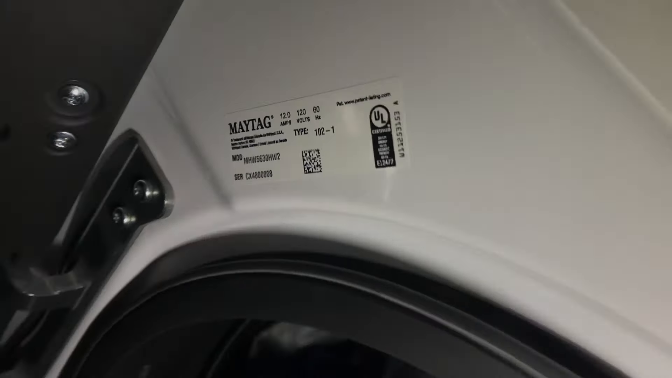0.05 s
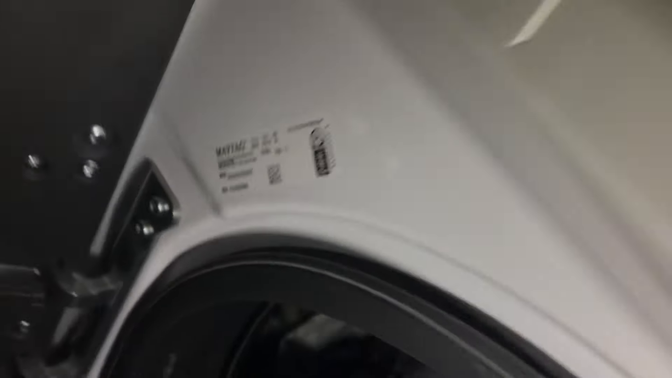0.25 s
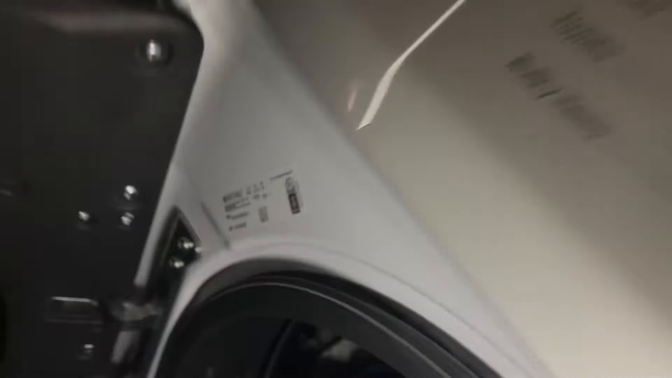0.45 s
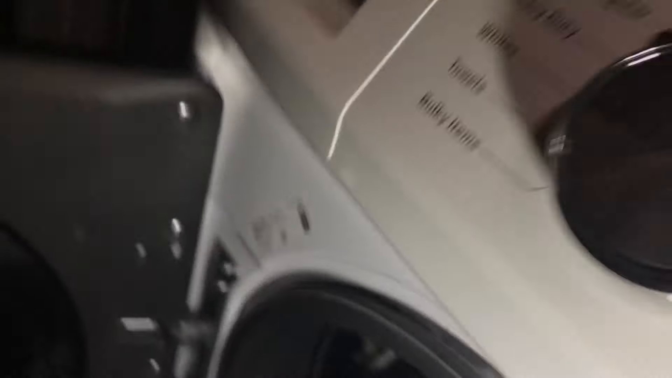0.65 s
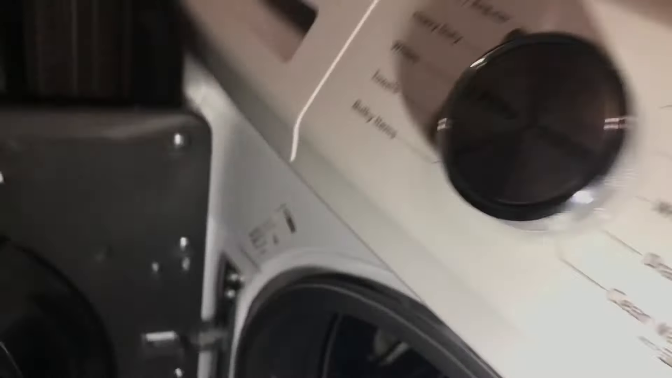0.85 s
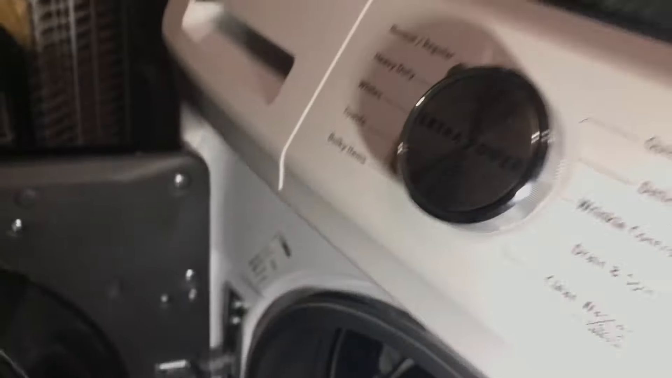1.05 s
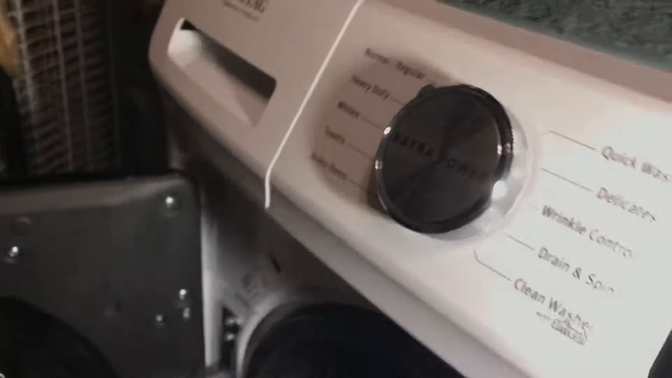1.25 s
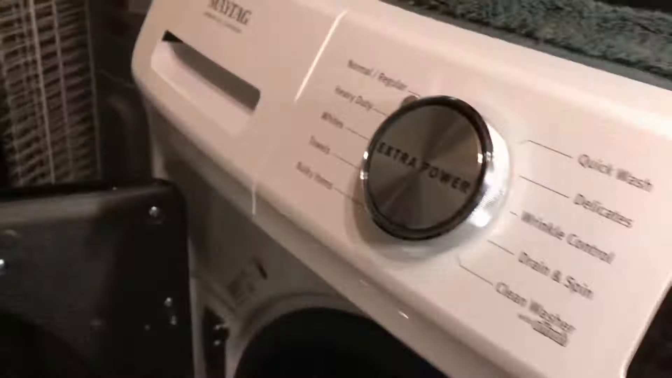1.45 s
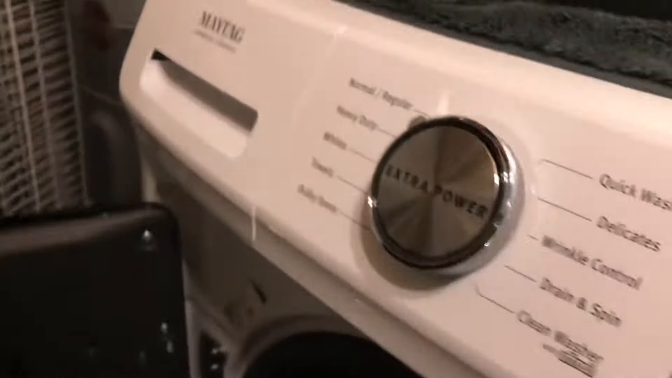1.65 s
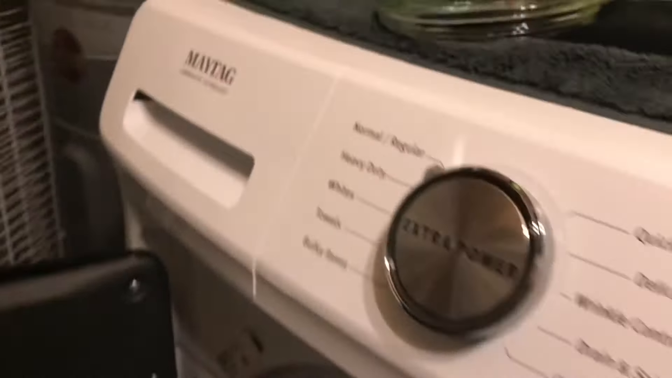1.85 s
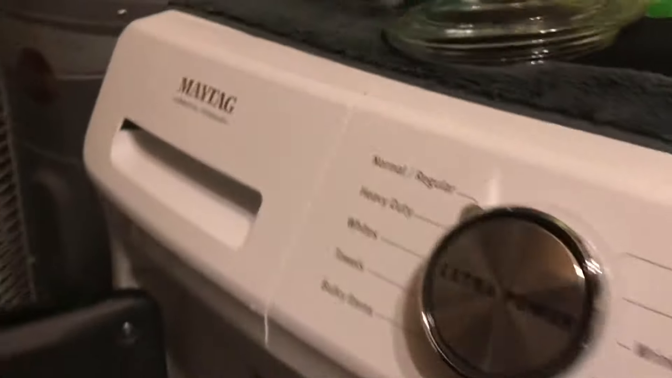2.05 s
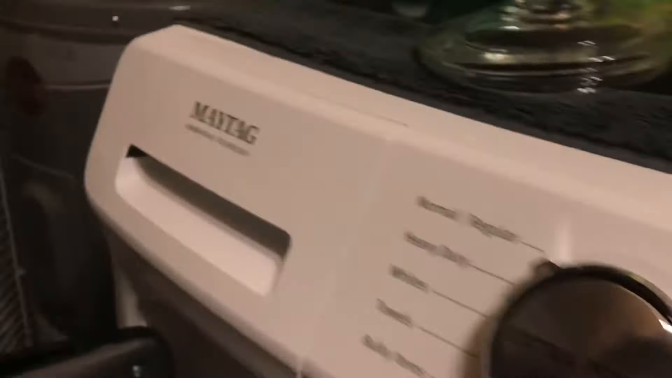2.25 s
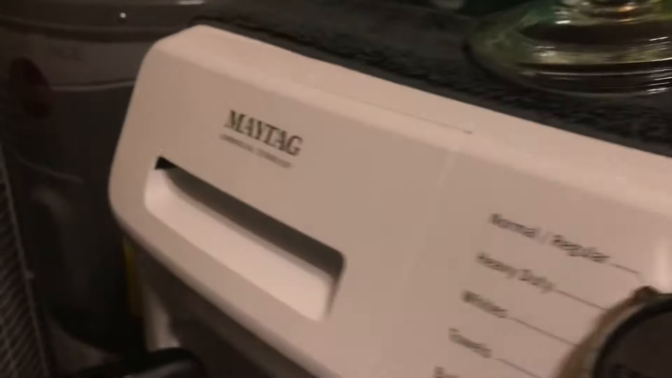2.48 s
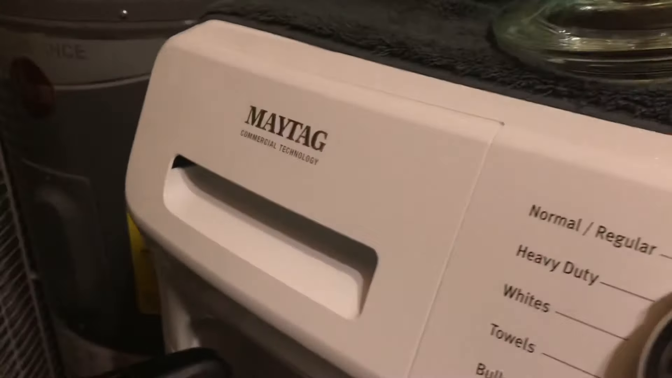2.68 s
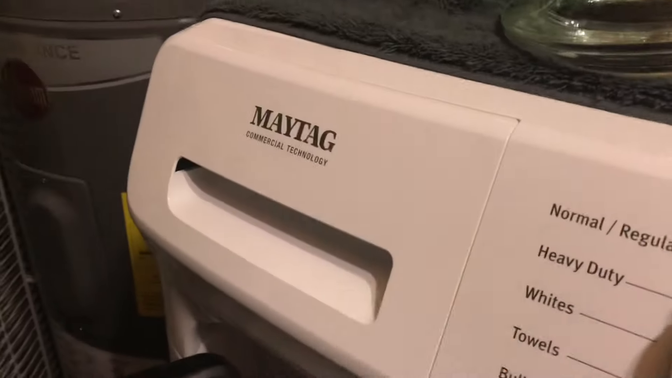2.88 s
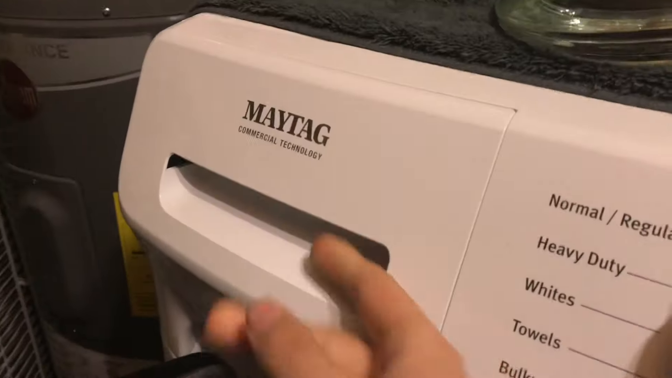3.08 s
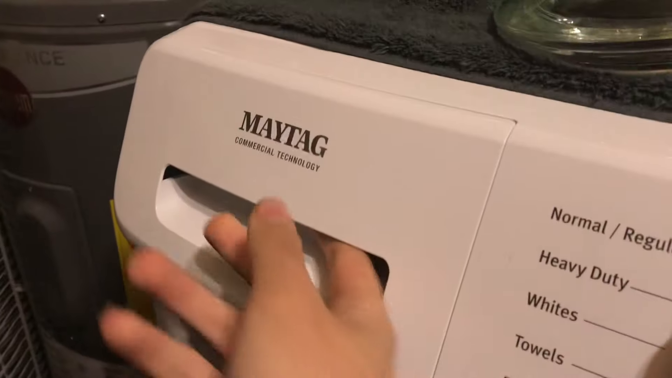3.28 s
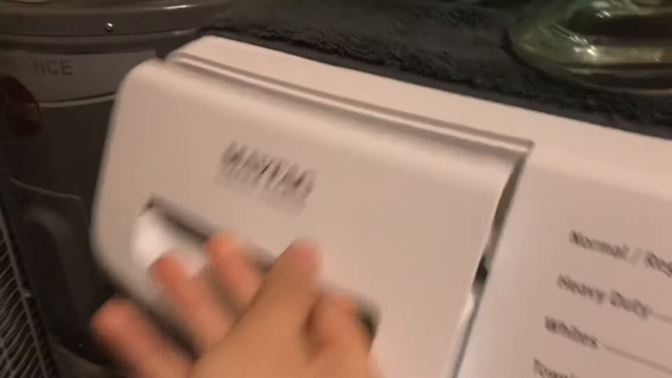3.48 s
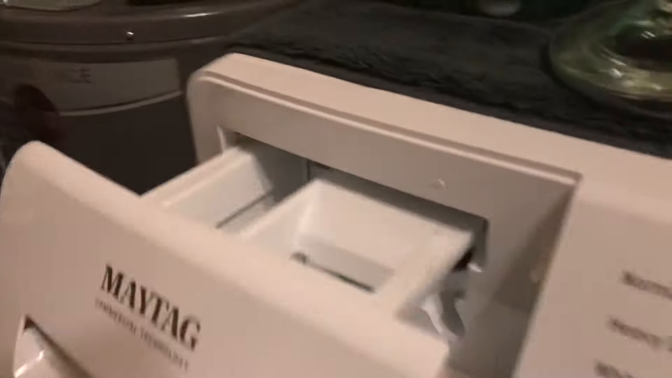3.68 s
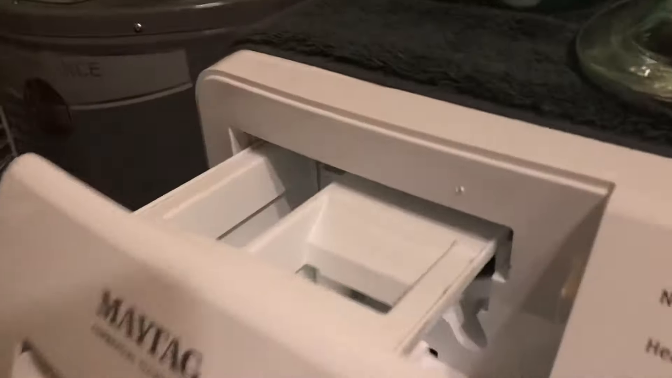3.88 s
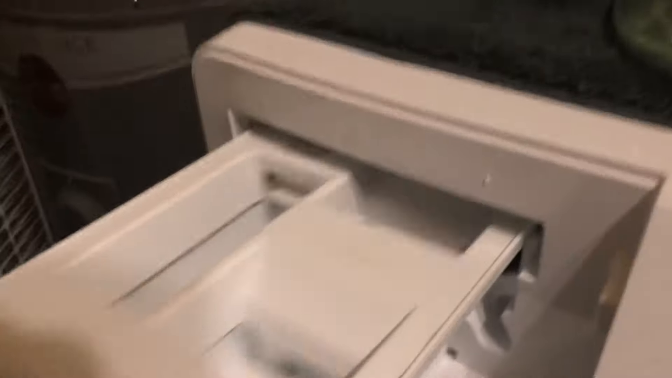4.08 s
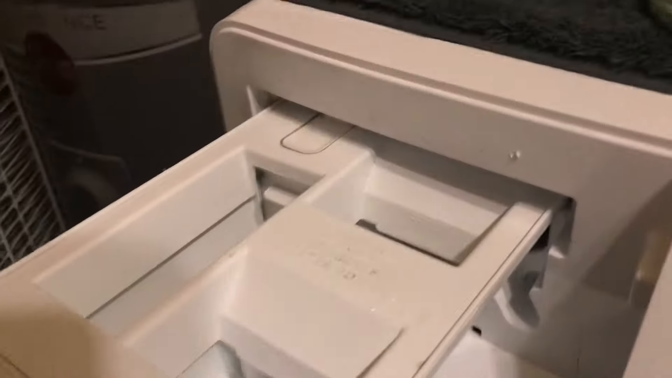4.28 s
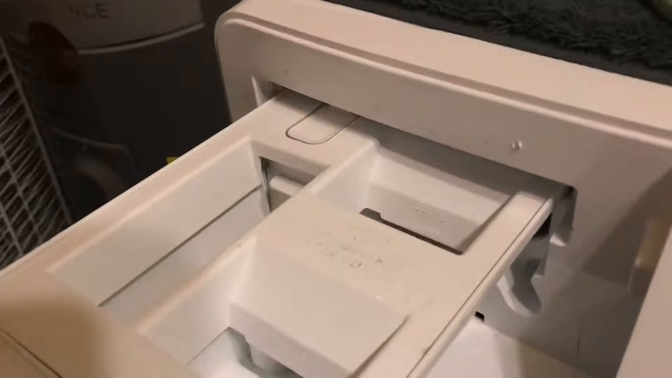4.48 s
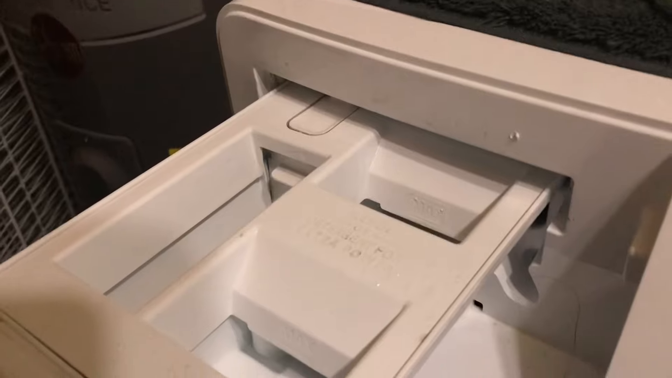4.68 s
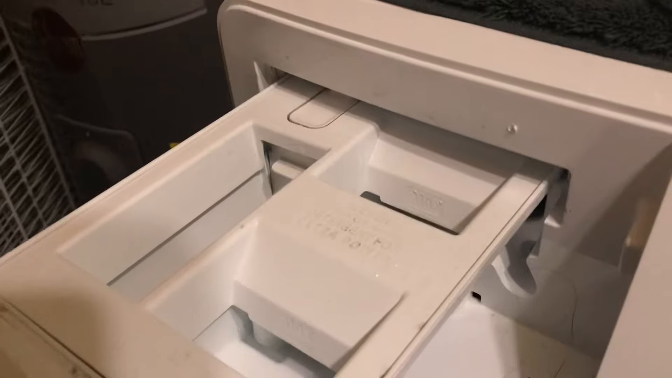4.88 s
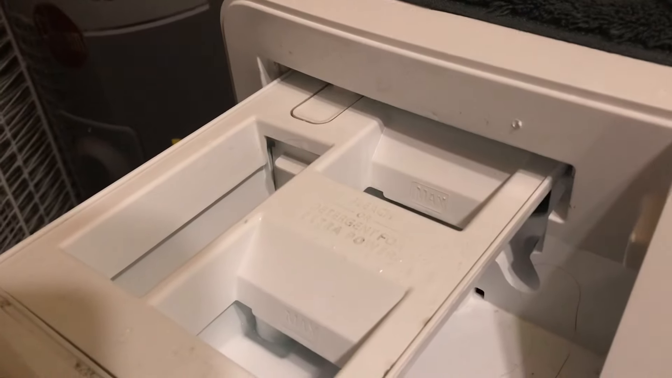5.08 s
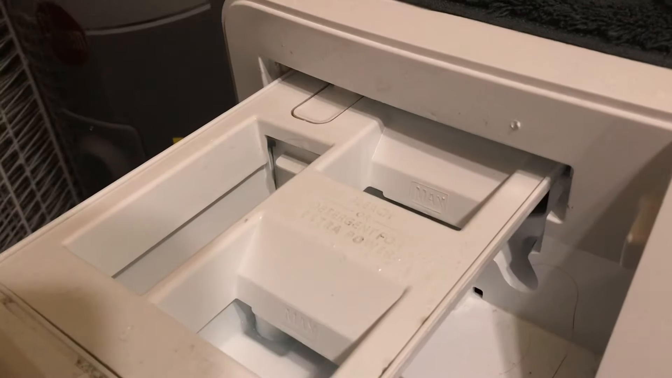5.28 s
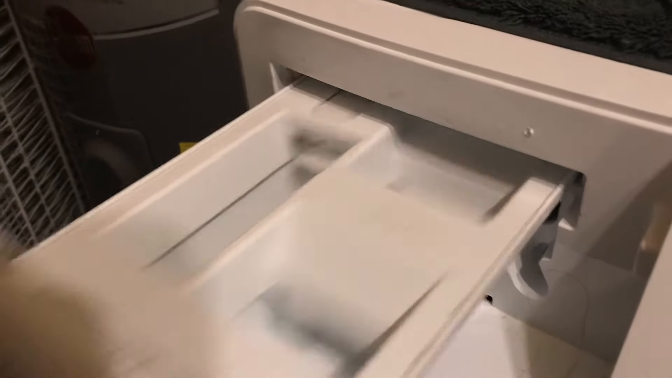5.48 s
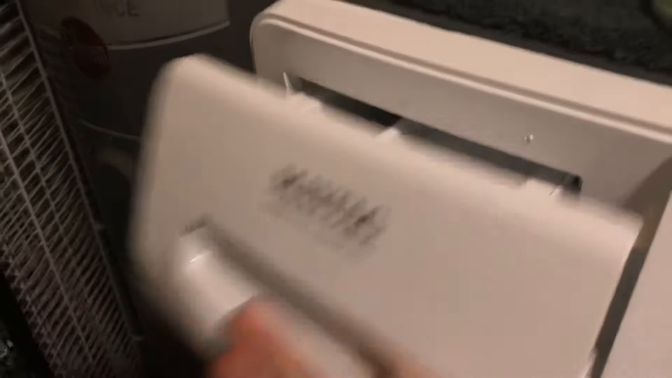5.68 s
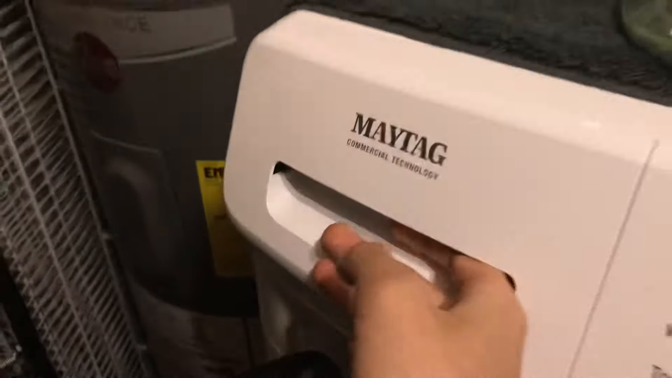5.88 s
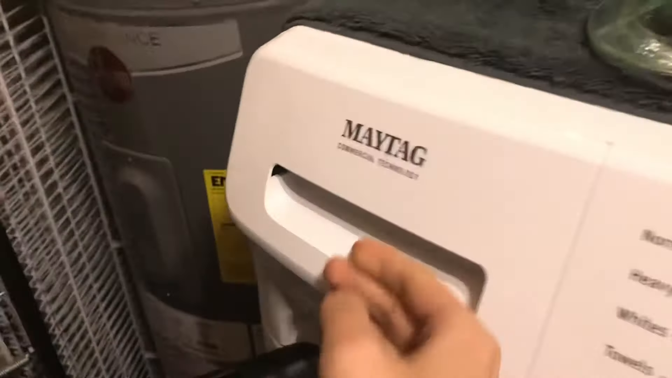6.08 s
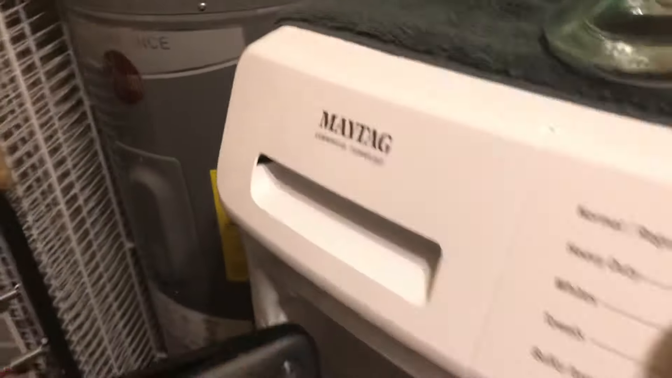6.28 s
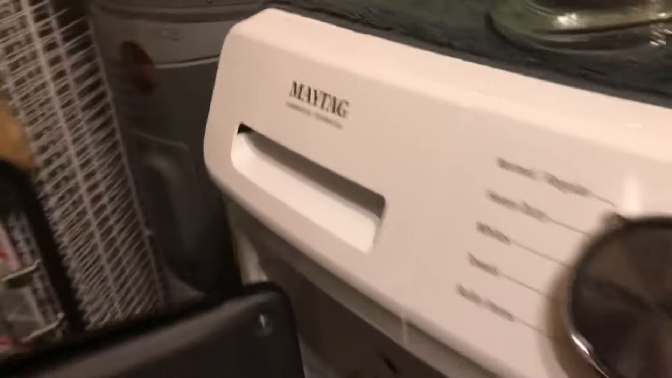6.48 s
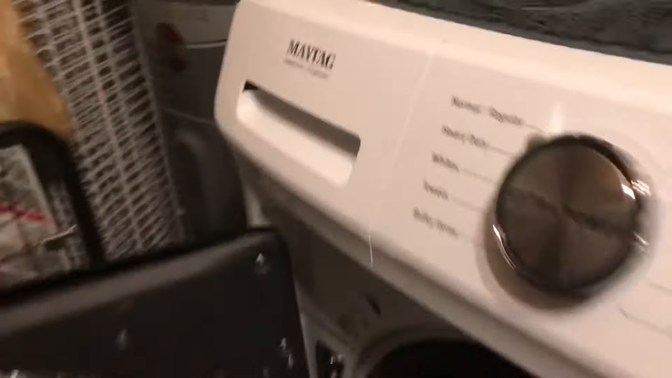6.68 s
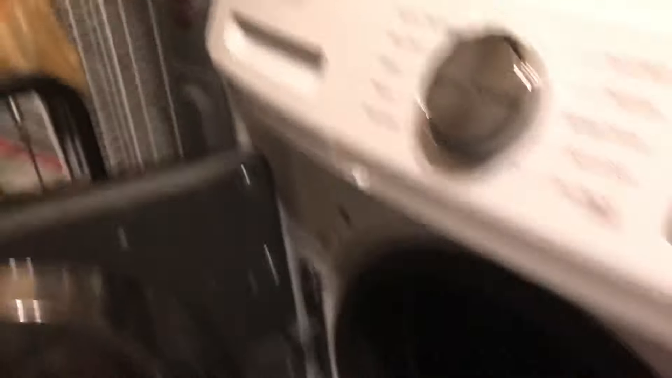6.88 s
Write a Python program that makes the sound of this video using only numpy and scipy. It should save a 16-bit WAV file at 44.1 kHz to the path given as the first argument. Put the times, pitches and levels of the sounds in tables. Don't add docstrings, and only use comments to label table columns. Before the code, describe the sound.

A plastic washer drawer is gripped, scraped out in two pulls to a hard stop, then shoved shut with loud booming clatter.

```python
import sys
import numpy as np
from scipy import signal
from scipy.fft import rfft, irfft, next_fast_len
from scipy.io import wavfile

SR = 44100
rng = np.random.default_rng(int(sys.argv[2]) if len(sys.argv) > 2 else 0)


def int16_out(signal):
    q = np.round(np.clip(np.atleast_2d(signal).T, -1, 1) * 32767)
    wavfile.write(sys.argv[1], SR, q.astype(np.int16))


def volts_from_decibels(level):
    exponent = np.asarray(level, float) / 20
    return 10 ** exponent


N = 306054

# (pitch [Hz], level [dB], t60 [s])
DRAWER_MODES = [(416, -5.5, 0.032), (490, -13.5, 0.026), (610, -6, 0.06), (713, -4, 0.02), (882, -3, 0.067),
                (954, -4.5, 0.099), (1050, -5.5, .04), (1246, -2, 0.058), (1322.5, 3, 0.038),
                (1553, -1.5, 0.026), (1770, -5, 0.049), (1850, -5.5, 0.04), (2102, -9.5, 0.042),
                (2270, -4, 0.071), (2470, -2, .03), (2899, -3, .03)]


def rms_one(x):
    return x / np.sqrt(np.mean(x ** 2) + 1e-20)


def at_hz(points, hz):
    point_hz, values = np.transpose(points)
    return np.interp(np.log(hz + 1e-9), np.log(point_hz), values)


def coloured(x, spectrum):
    size = next_fast_len(N)
    gain = volts_from_decibels(at_hz(spectrum, np.fft.rfftfreq(size, 1 / SR)))
    return rms_one(irfft(rfft(x, size) * gain, size)[:N])


def band_pass(x, low_hz, high_hz):
    return signal.sosfilt(signal.butter(2, [low_hz, high_hz], "band", fs=SR, output="sos"), x)


def low_cut(x, hz):
    return signal.sosfilt(signal.butter(2, hz, "high", fs=SR, output="sos"), x)


def drift(rate_hz):
    r = np.exp(-80 * np.pi * rate_hz / SR)
    slow = signal.lfilter([1], [1, -2 * r, r * r], rng.standard_normal(N // 40 + 2002))[2000:]
    return np.interp(np.arange(N) / 40, np.arange(len(slow)), rms_one(slow))


def ring(force, hz, t60):
    r = volts_from_decibels(-60 / (max(t60, .002) * SR))
    w = 2 * np.pi * hz / SR
    return signal.lfilter([0, np.sin(w)], [1, -2 * r * np.cos(w), r * r], force + 1e-18)


def swung_push(hz, cycles):
    length = round(cycles * SR / hz)
    return np.hanning(length) * np.sin(2 * np.pi * hz * np.arange(length) / SR)


def place(times, pieces):
    out = np.zeros(N + SR)
    for s, piece in zip(times, pieces):
        start = round(s * SR)
        out[start:start + len(piece)] += piece
    return out[:N]


def grains(per_s, spread_db):
    sizes = volts_from_decibels(spread_db * np.minimum(rng.exponential(1, N), 4)) * rng.choice([-1, 1], N)
    return rms_one(sizes * (rng.random(N) < per_s / SR))


def strokes(rows, edge_db):
    t = np.arange(N) / SR
    total = 0
    for *times, db in rows:
        corners = np.cumsum(np.abs(times))
        total = total + volts_from_decibels(db + np.interp(t, corners, [edge_db, 0, 0, edge_db], left=-200, right=-200))
    return total


def patchy(x, patchy_db):
    edges = 500 * 2 ** np.arange(0, 5.1, .5)
    return sum(volts_from_decibels(patchy_db * drift(12.0)) * band_pass(x, low, high) for low, high in zip(edges, edges[1:]))


def floor():
    # (frequency [Hz], density [dB per Hz])
    rumble = [(12, -54), (20, -19), (43, 0.5), (101, -2.5), (150, -4), (182, -1.5), (284, -4), (356, -4),
              (445, -12), (526, -10), (756, -13.5), (946, -13.5), (1900, -17.5), (3060, -19),
              (15900, -27.5)]
    # (pitch [Hz], level [dB rms])
    hum_tones = [(183.0, -76), (360.7, -74.5), (414.5, -79)]
    t = np.arange(N) / SR
    hum = sum(np.sqrt(2) * volts_from_decibels(db + 2.0 * drift(3.4)) * np.sin(2 * np.pi * hz * t) for hz, db in hum_tones)
    level_db = -54.5 + 0.16 * drift(2.2)
    return hum + volts_from_decibels(level_db) * coloured(rng.standard_normal(N), rumble)


def rustle():
    # (start [s], swell [s], hold [s], fade [s], level [dB])
    rubs = [
        (0.0, 0.19, 0.093, 0.47, -49.5),
        (0.35, .35, .15, 0.25, -46.5),
    ]
    # (start [s], swell [s], hold [s], fade [s], level [dB])
    grip = [
        (1.3, .22, .05, 0.49, -57),
        (3.064, 0.01, .006, 0.057, -57.5),
        (3.12, 0.045, 0.027, 0.05, -45),
        (3.205, 0.02, 0.012, 0.062, -50),
        (3.25, .04, 0.014, .04, -53),
        (3.35, 0.048, 0.0094, .01, -50.5),
        (5.3, 0.018, .003, 0.078, -62.5),
        (5.93, 0.018, 0.11, 0.11, -52),
        (6.006, 0.014, 0.0046, 0.014, -40),
        (6.87, 0.059, 0.014, .02, -54.5),
    ]
    # (frequency [Hz], density [dB per Hz])
    cloth_colour = [(530, -22), (900, -6.5), (1240, -14), (1800, -11.5), (2080, -9.5), (2880, -13),
                    (4180, -8), (7420, -14.5), (8170, -10), (10300, -19), (13000, -17), (15800, -37)]
    # (frequency [Hz], density [dB per Hz])
    skin_colour = [(150, -37), (250, -4), (319, -1), (640, -12), (816, -9.5), (1660, -17.5), (1860, -11),
                   (3130, -17.5), (4260, -15.5), (4840, -22), (12000, -29.5), (15600, -65), (22000, -120)]
    # (pitch [Hz], width [Hz], level [dB])
    hollows = [(850, 25, -3.5), (1886, 100, 0.5), (2170, 37, -5), (2450, 120, -1), (2850, 210, -4),
               (3510, 72, -5), (4170, 75, -4), (5800, 100, -8)]

    first_peak_hz = 2090 * (1 + 0.05 * drift(1.2))
    fibres = coloured(grains(per_s=41000.0, spread_db=2.5), cloth_colour) * volts_from_decibels(0.84 * drift(32.0))
    cloth = 0
    for k in range(4):
        share = np.clip(0.29 * volts_from_decibels(1.9 * drift(3.0)), 0, .7) ** k
        cloth = cloth + share * np.interp(np.arange(N) - k * SR / first_peak_hz, np.arange(N), fibres)

    touch = grains(per_s=9000.0, spread_db=0.5)
    body = sum(ring(touch, hz, 2.5 / max(width, 120)) * volts_from_decibels(db) for hz, width, db in hollows)
    fingers = coloured(touch, skin_colour) + volts_from_decibels(-5) * rms_one(body)
    fingers = fingers * volts_from_decibels(2.4 * drift(40.0))
    return strokes(rubs, edge_db=-13) * patchy(cloth, patchy_db=1.33) + strokes(grip, edge_db=-22.5) * fingers


def thumps():
    # (time [s], peak [dB], pitch [Hz])
    blows = [(0.138, -45.5, 207), (0.496, -35, 372), (0.622, -37, 356), (0.718, -41.5, 319),
             (0.887, -42.5, 262), (1.86, -10.5, 160), (1.905, -22, 200), (1.925, -22, 109),
             (2.025, -35, 201), (2.327, -50, 106), (3.067, -36, 146), (3.09, -38.5, 190), (3.42, -19, 166),
             (3.458, -8, 158), (3.455, -14.5, 310), (3.484, -10, 160), (3.561, -16, 344), (3.624, -9, 214),
             (3.977, -30, 178), (3.565, -20, 200), (4.24, -19, 201), (4.062, -17, 270), (4.082, -15.5, 165),
             (4.158, -0.5, 188), (4.2, -17.5, 217), (5.315, -27.5, 215), (5.486, -32, 190),
             (5.551, -12, 228), (5.674, -13.5, 184), (5.719, -10, 320), (5.722, -14.5, 160),
             (5.767, -7, 156), (5.827, -2, 128), (5.832, -4, 205), (5.86, -12, 245)]
    # (pitch [Hz], level [dB], t60 [s])
    panels = [(61.7, -22, 0.67), (72.3, -17, 0.89), (93, -17.5, 0.24), (107, -13, 0.1), (131, -10, 0.086),
              (156.2, -14, 0.34), (188, -10, 0.21), (215, -15, 0.32), (251.2, -10.5, 0.36),
              (289.3, -14.5, 0.21), (320, -17, 0.55), (357, -15.5, .2)]
    note_cycles = 10.5
    s, peak_db, hz = np.transpose(blows)
    push = np.pad(np.hanning(44) / 22, (0, SR // 2))
    notes = [volts_from_decibels(db) * ring(push, h, note_cycles / h) for db, h in zip(peak_db, hz)]
    out = volts_from_decibels(2.5) * place(s, notes)

    panel_db = peak_db - 5 - 2.5 * (s < 3)
    shape = (len(s), len(panels))
    luck = volts_from_decibels(2.0 * rng.standard_normal(shape)) * rng.choice([-1, 1], shape)
    for k, (mode_hz, mode_db, t60) in enumerate(panels):
        shudder = swung_push(mode_hz, cycles=1.4)
        shudder = shudder / np.sum(np.abs(shudder))
        strength = volts_from_decibels(panel_db + mode_db) * luck[:, k]
        out += ring(place(s, shudder * strength[:, None]), mode_hz, t60)
    return low_cut(out, 85)


def knocks():
    # (time [s], peak [dB], brightness [dB], dying time [ms], rise [ms])
    bumps = [
        (0.495, -32, -43, 1.9, 0.65),
        (0.622, -31.5, -36, 1.8, 1.1),
        (0.719, -45, -37, 4, 1.1),
        (0.887, -39, -37, 4, 1.1),
        (1.8403, -15, -14.5, 5.3, 1.4),
        (1.858, -24.5, -14, 15, 1.1),
        (2.037, -32.5, -22, 13, 1.1),
    ]
    # (time [s], peak [dB], brightness [dB], dying time [ms], rise [ms])
    catches = [(3.415, -20, -17, 7.7, 1.1), (3.4169, -23, 0.5, 4.5, .4), (3.452, -6, -26, 9.7, 1.5),
               (3.4600, -2.5, -9, 3.5, .4), (3.465, -0.5, -19, 8, 1.3), (3.476, -2, -11.5, 4.5, .4),
               (3.485, -7, -21, 4.8, 0.95), (3.5577, -1, -16.5, 8.9, 1.5), (3.6209, -4, -23, 6, 2.33),
               (4.0614, -11, -23.5, 5, 1.1), (4.0825, 4.5, -16, 5.5, .8), (4.154, 12, -16, 7.3, .8),
               (4.161, 1.5, -2.5, 5, .8), (4.222, -12.5, -30, 6.6, 2.1), (5.314, -34.5, -38, 6, 1.1),
               (5.4421, -21, -14.5, 3.7, .5), (5.484, -24, 2.5, 3, .5), (5.494, -19, -24, 8, 6.0),
               (5.547, 5, -12, 6.7, .8), (5.5522, 5, -2, 5, .8), (5.679, -11.5, -27, 8.6, 1.1),
               (5.715, -7, -22.5, 6, 5.0), (5.7283, 4, -17.5, 5.6, 5.0), (5.762, -3, -11.5, 4, .6),
               (5.7704, 2.5, -19, 4, .8), (5.776, -0.5, -16, 4.5, .8), (5.785, -10, -16, 3, 1.1),
               (5.796, -4, -27.5, 8.4, 2.9), (5.811, -10, -30, 5, 2.2), (5.819, 6, -31.5, 4, .8),
               (5.8237, 11, -3.5, 4.9, .6), (5.829, 8, -4.5, 5.9, 1.1), (5.8415, 9, -14.5, 5, 1.1),
               (5.852, -0.5, -28.5, 8, 1.5), (6.017, -30, -20, 4.6, 3.6)]
    # (time [s], peak [dB], brightness [dB], dying time [ms], rise [ms])
    shoves = [
        (1.885, -32, -25, 28, 6.7),
        (3.435, -17, -43, 16.2, 4.0),
        (5.518, -20.5, -8.5, 19, 7.0),
        (5.93, -33, -18, 21, 1.1),
    ]
    # (frequency [Hz], density [dB per Hz])
    plastic = [(210, -31), (350, -5), (936, -5), (1790, -4.5), (2750, -6.5), (4430, -14), (4870, -15),
               (6500, -16), (7710, -25.5), (13900, -30), (15500, -37)]
    # (frequency [Hz], factor on the dying time [1])
    dying = [(400, 1.6), (1000, 1.6), (2000, 1.3), (5000, 1.2), (12000, 0.9)]
    # (pitch [Hz], level [dB], t60 [s])
    face_modes = [(3470, -9.5, 0.016), (4000, -9.5, .02), (4370, -9.5, .022), (5340, -12, .018),
                  (6600, -17, .015), (6260, -17.5, 0.016)]

    s, peak_db, bright_db, ms, rise_ms = np.transpose(bumps + catches + shoves)
    t = np.arange(6000) / SR
    white = rng.standard_normal((len(s), 2, len(t)))

    def fade(dying_ms):
        decay = np.exp(-1000 * t / np.clip(dying_ms, .3, 28)[:, None])
        return decay * np.clip(1000 * t / np.clip(rise_ms, .2, 8)[:, None], 0, 1)

    burst = 0
    edges = 350 * 2 ** np.arange(0, 5.6, .5)
    for k, (low, high) in enumerate(zip(edges, edges[1:])):
        mid = np.sqrt(low * high)
        tilt_db = (bright_db + 16.0) * np.clip(np.log2(mid / 1400) / 3.2, -.5, 1.2)
        if mid > 7200:
            tilt_db = tilt_db + 0.4 * np.minimum(bright_db + 8.0, 0) + 3.0
        level = volts_from_decibels(peak_db + 5.5 + tilt_db + at_hz(plastic, mid))
        shaken = white[:, k % 2] * fade(ms * at_hz(dying, mid)) * level[:, None]
        burst = burst + band_pass(shaken, low, high)

    force = white[:, 0] * fade(0.12 * ms + 0.36 * rise_ms)
    force = force / np.sqrt(np.sum(force ** 2, axis=1, keepdims=True)) * volts_from_decibels(peak_db)[:, None]
    all_modes = DRAWER_MODES + face_modes
    luck = volts_from_decibels(4.0 * np.clip(rng.standard_normal((len(s), len(all_modes))), -2, 1))
    luck[:len(bumps)] = 0
    sharp_db = np.outer(bright_db + 12.0, np.log2(np.array(all_modes)[:, 0] / 1200) / 3.0)
    share = luck * volts_from_decibels(sharp_db)
    modes = 0
    for k, (hz, db, t60) in enumerate(all_modes):
        modes = modes + ring(place(s, force * share[:, [k]]), hz, t60) * volts_from_decibels(db - 20) * (-1) ** k
    return place(s, burst) + modes


def ticks():
    # (time [s], peak [dB], pitch [Hz], dying time [ms])
    snaps = [(0.514, -35, 3980, 4), (0.535, -45, 7500, 4), (0.5544, -38, 2100, 4), (1.667, -33.5, 4830, 4),
             (1.8413, -11, 3400, 1.5), (1.859, -24, 2700, 1.5), (2.0216, -20.5, 2670, 1.8),
             (2.0357, -23.5, 2960, 1.6), (2.103, -34, 2800, 1.5), (2.323, -40, 2500, 3),
             (3.075, -40, 1200, 4), (3.154, -38, 1770, 3), (3.2234, -38, 1800, 3), (3.3681, -43, 2500, 5),
             (3.3955, -40, 2150, 4), (3.867, -56, 9100, 2.5), (3.943, -52, 11900, 2.5),
             (4.1612, -4, 11600, 1.8), (4.4276, -50.5, 6510, 3), (4.835, -38, 6600, 3.5),
             (5.364, -49.5, 4990, 4), (5.8133, -9, 12500, 3.8), (5.9606, -29, 4000, 3.5),
             (5.9612, -41, 11000, 2.5), (6.024, -42, 11000, 3), (6.062, -34.5, 7480, 3),
             (6.0625, -34, 2500, 3), (6.165, -49, 13000, 6.2), (6.2615, -33, 4120, 3.2),
             (6.262, -45, 10050, 3), (6.27, -35, 3000, 4.9), (6.6975, -50, 1430, 4.2),
             (6.7386, -38, 4060, 4), (6.908, -51, 1230, 4), (6.9209, -47.5, 1050, 4), (2.545, -50, 7000, 3),
             (2.92, -49, 6000, 3.2), (6.739, -45, 10000, 3.4)]
    span = 1.6
    s, peak_db, pitch_hz, dying_ms = np.transpose(snaps)
    t = np.arange(1500) / SR
    white = rng.standard_normal((len(s), len(t))) * volts_from_decibels(peak_db)[:, None]
    pieces = []
    for noise, hz, ms in zip(white, pitch_hz, dying_ms):
        snap = band_pass(noise * np.exp(-1000 * t / max(ms, .3)), hz / span, min(hz * span, 16e3))
        edge = np.diff(noise, prepend=0) * np.exp(-t / 0.001)
        pieces.append(volts_from_decibels(0.5) * snap + volts_from_decibels(-21) * edge)
    return place(s, pieces)


def clacks():
    # (time [s], peak [dB], pitch [Hz], t60 [s])
    clear_notes = [(1.84, -24.5, 1003, 0.078), (3.4155, -26, 995, 0.066), (3.435, -21, 640, 0.12),
                   (3.559, -5, 1776, 0.077), (3.567, -5, 1776, 0.044), (3.56, -16.5, 1800, 0.059),
                   (4.156, -8, 5800, .04), (4.156, -8, 3273, .05), (4.156, -4, 1179, 0.072),
                   (5.552, -10, 6000, 0.063), (1.862, -29, 520, 0.11), (1.862, -23, 333, 0.11),
                   (3.558, -11, 3800, 0.042), (3.559, -19, 691.7, 0.047), (3.621, -9.5, 692, .05),
                   (4.083, -10.5, 2383, 0.052), (4.085, -13.5, 415, .07), (4.158, -2.5, 600, .09),
                   (4.157, -5, 1868, .06), (4.2, -21, 530, 0.1), (3.622, -14, 5200, 0.036),
                   (3.622, -18.5, 4200, .03), (3.56, -16, 620, .06), (5.68, -17, 620, 0.056),
                   (5.835, -6, 430, .07), (5.552, -14, 640, 0.046), (5.824, -8.5, 6100, .03),
                   (5.683, -34, 6800, .06), (4.154, -5.5, 684, .07), (4.154, -5, 1320, 0.069),
                   (4.154, -7, 740, 0.046), (5.547, -5.5, 923, 0.063), (5.5, -23.5, 970, .06),
                   (5.553, -7, 1556, 0.084), (5.549, -6, 3100, 0.049), (5.551, -11.5, 300, 0.25),
                   (5.771, -3.5, 689.7, 0.057), (5.819, -1.5, 677.5, .04), (5.83, -3.5, 320, 0.075),
                   (5.93, -41, 1290, 0.14), (4.835, -38, 5600, 0.036), (6.021, -36, 1900, .04),
                   (6.022, -38, 2300, .03), (6.02, -42, 550, 0.097)]
    click = np.pad(np.hanning(9) / 4, (0, 9000))
    return place([c[0] for c in clear_notes], [volts_from_decibels(db) * ring(click, hz, t60) for s, db, hz, t60 in clear_notes])


def booms():
    # (time [s], peak [dB], pitch [Hz], t60 [s])
    panel_booms = [(1.854, -18.5, 88.5, 0.17), (2.03, -39.5, 55, 0.38), (3.119, -41, 71, 0.5),
                   (3.534, -21, 67.8, 0.4), (3.678, -36.5, 70.5, 0.81), (4.19, -19.5, 60.9, 0.54),
                   (4.22, -35, 74.4, 1.27), (5.572, -46, 69, 0.27), (5.851, -14.5, 61.4, 0.32),
                   (5.95, -38, 55.7, .9), (6.05, -39, 72.8, 0.95), (6.202, -49, 234.8, 0.77),
                   (4.299, -46, 319.7, 1.4), (6.1, -50, 320, 0.97), (4.27, -46, 580, 0.37),
                   (6.0, -43.5, 570, 0.29), (3.72, -42, 372, 0.58)]
    pieces = []
    for s, db, hz, t60 in panel_booms:
        swell = swung_push(hz, cycles=2) * 2 * hz / SR
        pieces.append(volts_from_decibels(db) * ring(np.pad(swell, (0, SR - 4000)), hz, t60))
    return place([b[0] for b in panel_booms], pieces)


def slide():
    # (time [s], level [dB])
    runs = [
        [(3.42, -67), (3.47, -43.5), (3.59, -41), (3.69, -41), (3.74, -51.5), (3.82, -74.5)],
        [(3.84, -62), (3.95, -42), (4.072, -34), (4.1, -37), (4.15, -33.5), (4.2, -60.5)],
        [(5.445, -54), (5.507, -33.5), (5.627, -41), (5.691, -33.5), (5.747, -46.5), (5.87, -50)],
    ]
    # (frequency [Hz], density [dB per Hz])
    scrape_colour = [(880, -34), (1500, -6.5), (1940, -7), (2140, -12), (3400, -6.5), (6020, -6),
                     (7330, -12.5), (10500, -18), (13800, -17), (15800, -26.5)]
    slips = grains(per_s=1500.0, spread_db=4.5)
    rattle = 0
    for k, (hz, db, t60) in enumerate(DRAWER_MODES):
        rattle = rattle + ring(slips, hz, 0.74 * t60) * volts_from_decibels(db) * (-1) ** k
    scrape = coloured(grains(per_s=4200.0, spread_db=-0.5), scrape_colour) * volts_from_decibels(drift(40.0))
    t = np.arange(N) / SR
    speed = sum(volts_from_decibels(np.interp(t, s, db, left=-200, right=-200)) for s, db in map(np.transpose, runs))
    return speed * (scrape + volts_from_decibels(-4) * rms_one(rattle))


def room(x):
    # (frequency [Hz], t60 [s])
    room_t60 = [(60, 0.29), (250, 0.41), (1000, 0.22), (3000, 0.16), (8000, 0.17), (15000, 0.11)]
    t = np.arange(SR // 2) / SR
    edges = 45 * 2 ** np.arange(0, 8.6, .5)
    tail = 0
    for low, high in zip(edges, edges[1:]):
        band = band_pass(rng.standard_normal(len(t)), low, high)
        tail = tail + band * volts_from_decibels(-60 * t / at_hz(room_t60, np.sqrt(low * high)))
    tail = tail * np.clip((t - .003) / 0.015, 0, 1)
    return signal.fftconvolve(x, tail / np.sqrt(np.sum(tail ** 2)))[:N]


def scene():
    cabinet = thumps()
    drawer = knocks() + ticks() + clacks() + slide()
    wet = room(volts_from_decibels(-21) * drawer + volts_from_decibels(-14) * cabinet)
    return (floor() + rustle() + cabinet + drawer + booms() + wet)[None]


def low_pass(x):
    return signal.sosfilt(signal.butter(12, 20000, fs=SR, output="sos"), x)


def record(dry):
    port_hz, port_width_hz, port_share = 10430, 640, 0.35
    heard = low_cut(dry, 43.6)
    heard = heard - port_share * signal.lfilter(*signal.iirpeak(port_hz, port_hz / port_width_hz, fs=SR), heard)
    heard = signal.sosfilt(signal.cheby2(14, 60, 16250, fs=SR, output="sos"), heard)
    return low_pass(np.clip(heard, -1, 1))


dry = scene()
out = record(dry)
int16_out(out)
```